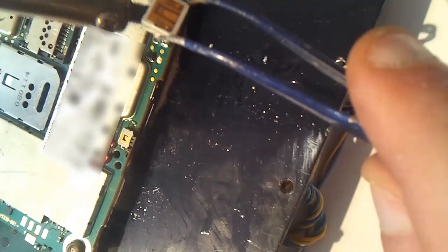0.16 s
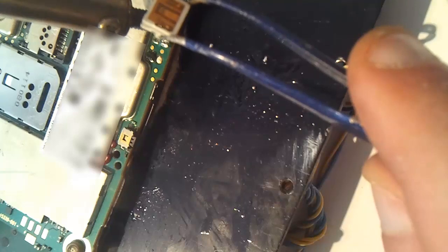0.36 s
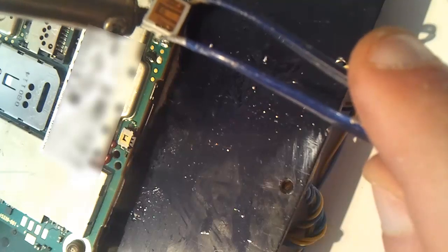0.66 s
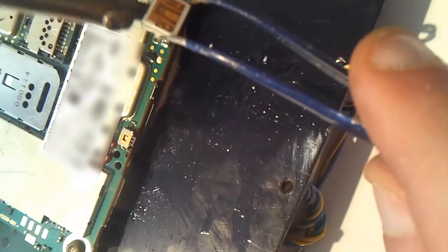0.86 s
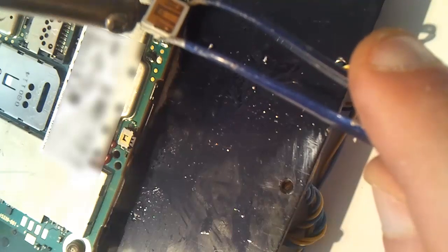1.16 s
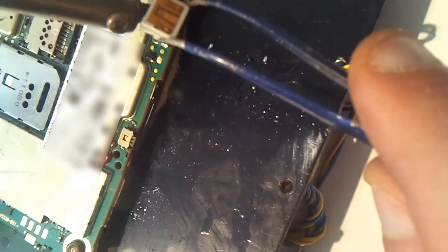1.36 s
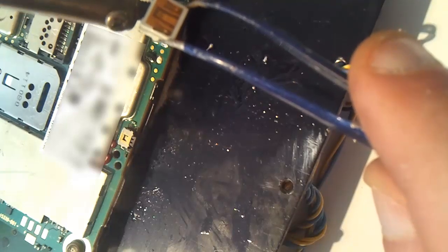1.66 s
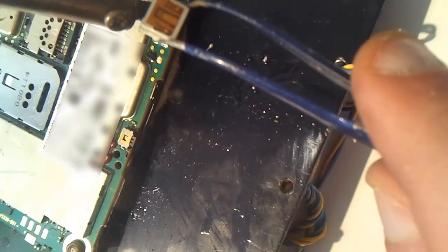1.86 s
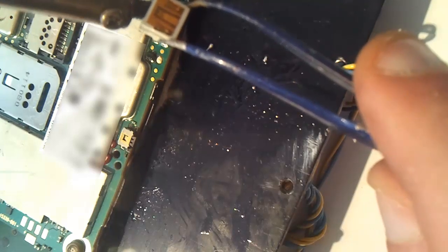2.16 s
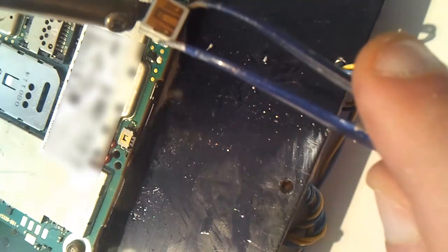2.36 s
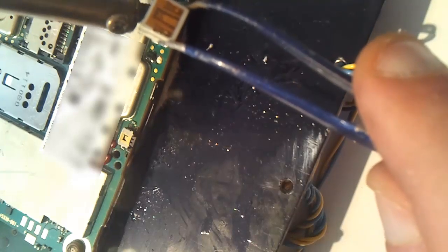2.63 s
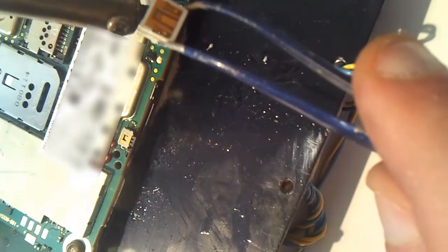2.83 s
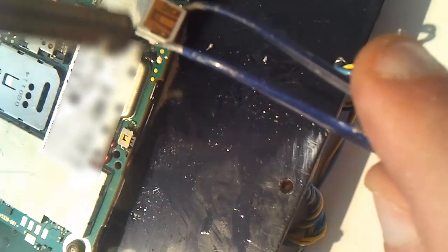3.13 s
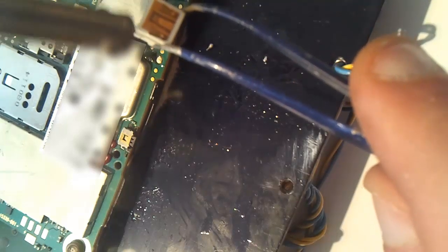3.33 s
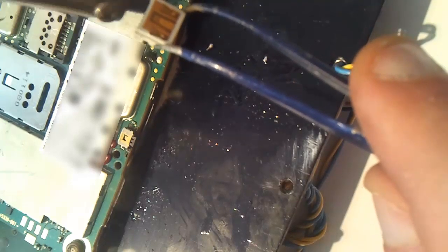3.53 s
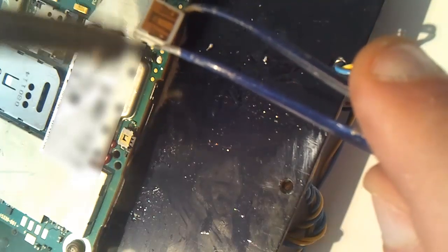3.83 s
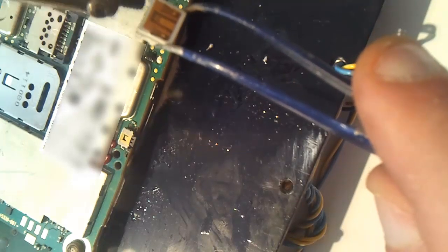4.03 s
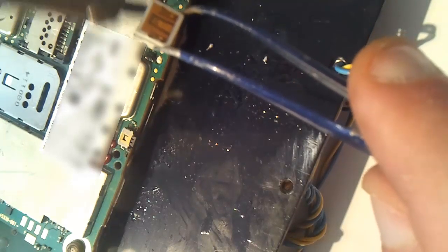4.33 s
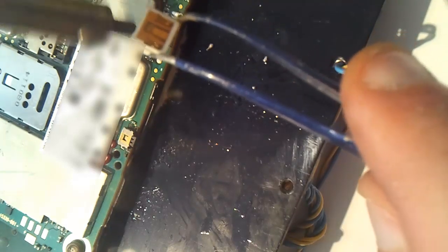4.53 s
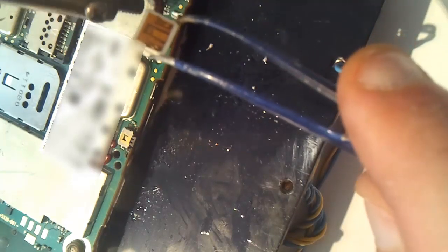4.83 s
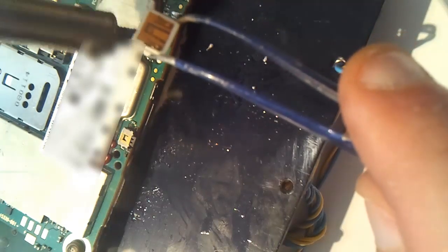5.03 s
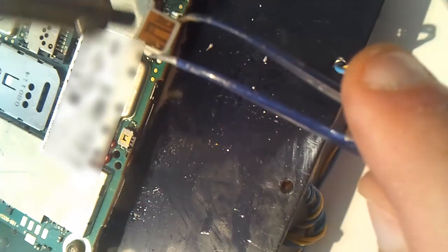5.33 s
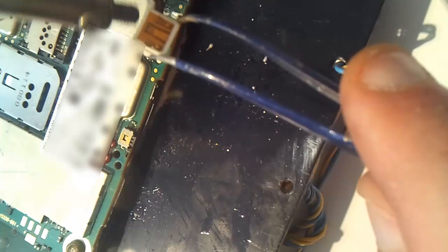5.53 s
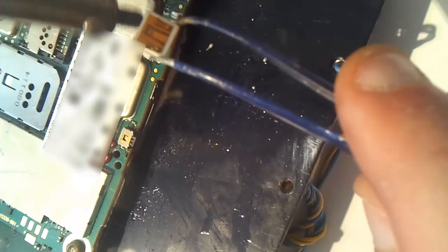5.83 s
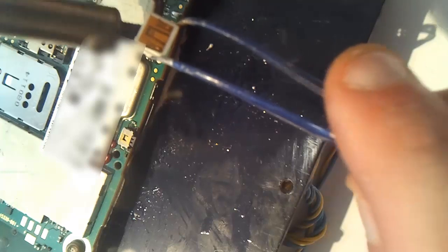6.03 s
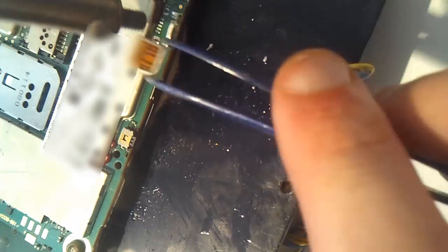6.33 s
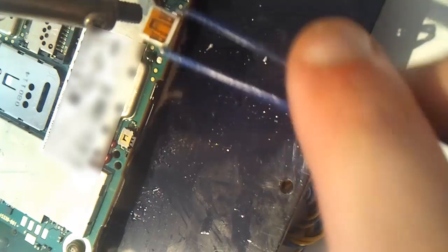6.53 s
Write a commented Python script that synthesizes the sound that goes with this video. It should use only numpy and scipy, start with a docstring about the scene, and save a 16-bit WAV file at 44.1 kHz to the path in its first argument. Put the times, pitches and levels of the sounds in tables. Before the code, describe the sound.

Close, steady rush and fan whine of a hot-air gun, its jet hissing and briefly whistling as it moves over a circuit board.

```python
"""A hot-air gun blows steadily over a circuit board, close to a single microphone.
Turbulent air rushes through the resonant barrel, and the jet hisses as the nozzle moves over the parts.
The fan whines on multiples of its rotation, the jet whistles briefly where it grazes an edge, and soft
low hums come and go. The recorder holds each of its 16 kHz samples, which mirrors the hiss upward."""
import sys
import numpy as np
from scipy import signal
from scipy.fft import rfft, irfft
from scipy.io import wavfile

SR = 44100
rng = np.random.default_rng(int(sys.argv[2]) if len(sys.argv) > 2 else 0)


def to_wav(sig):
    """Store sig (one row per channel, or 1-D mono) as 16-bit WAV at the path in sys.argv[1].

    Samples outside -1..1 are clipped; the rate is SR.
    """
    pcm = np.clip(np.atleast_2d(sig), -1, 1) * 32767
    pcm = np.round(pcm).astype(np.int16)
    wavfile.write(sys.argv[1], SR, pcm.T)  # frames by channels


N = 295029
TIME = np.arange(N) / SR
FREQS = np.maximum(np.arange(N // 2 + 1) * SR / N, 1)

# The rush as the nozzle moves about. Each row: time in seconds, relative level in dB.
RUSH_LEVELS = [(0, -16.7), (2.1, -16), (3.05, -16.5), (4.15, -16.0), (4.7, -17.0), (5.5, -16.5), (6.3, -16),
               (6.69, -16.5)]
# Broad turbulence. Each row: frequency in Hz, level in dB per Hz.
RUSH_SPECTRUM = [(25, -76), (80, -71), (200, -64.5), (500, -61.5), (900, -64), (1500, -60.0), (3000, -67),
                 (5000, -54.5), (8000, -53.5)]
# Deep air resonances of the barrel. Each row: centre in Hz, width in Hz, mid-scene level in dB per Hz.
BARREL_MODES = [(561, 63, -58.5), (670, 43, -56), (756, 146.0, -52.5), (946, 126, -46.5), (1029, 47, -46),
                (1075, 123, -46), (1340, 150, -60)]
# High air resonances of the nozzle tube. Each row: centre in Hz, width in Hz, level in dB per Hz.
NOZZLE_MODES = [(2094, 320, -55.5), (2403, 300, -53), (2802, 340, -49), (3145, 206, -49.5),
                (3315, 147.0, -52.5), (3410, 266, -49), (3804, 290, -51.5), (4043, 260, -49.5),
                (4187, 300, -50), (4780, 190, -53.5), (5050, 350, -57.5), (5580, 79, -52), (6340, 430, -51)]
# Resonances at the nozzle's rim. Each row: centre in Hz, width in Hz, relative level in dB.
RIM_MODES = [(6985, 190, -46.5), (7180, 240, -49.5)]
# Resonances that fade or grow. Each row: centre in Hz, width in Hz, first and last level in dB per Hz.
SHIFTING_MODES = [(822, 34, -46, -49.5), (1742, 400, -59.5, -53.5)]
# Resonances of the housing. Each row: centre in Hz, width in Hz, relative level in dB.
HOUSING_MODES = [(135.5, 25, -62.0), (260, 18, -57), (305, 48, -60), (359.4, 33, -55.6)]
# The hiss as the nozzle sweeps on and off the parts. Each row: time in seconds, relative level in dB.
HISS_LEVELS = [(0, -24), (0.27, -27), (0.4, -21.5), (0.64, -24), (0.76, -21.4), (1.33, -21), (1.48, -23.8),
               (1.97, -22.5), (2.63, -22.2), (2.8, -24.5), (3.27, -23), (3.48, -20.4), (3.88, -24),
               (4.1, -20), (4.25, -23.5), (4.85, -23.6), (6.0, -24), (6.69, -21.2)]
# Resonances between nozzle and board. Each row: centre in Hz, width in Hz, relative level in dB.
GAP_MODES = [(7585, 237, -49), (7900, 520, -48.5)]
# Fan tones. Each row: multiple of the rotation, level in dB rms, unsteadiness as a share of amplitude.
FAN_TONES = [(1, -51, 0.56), (3, -30, 0.33), (4, -42, 0.45), (5, -29.5, 0.15), (7, -42, 0.29),
             (8, -29.5, 0.15)]
# Edge whistles. Each row: start in seconds, length in seconds, pitch in Hz, level in dB before flicker.
EDGE_WHISTLES = [(0.041, .124, 7100, -16.5), (0.175, .05, 7160, -19), (1.984, 0.083, 7760, -22.5),
                 (2.17, 0.057, 7310, -20.5), (3.034, .06, 7870, -23), (3.511, .039, 7835, -22),
                 (3.71, .085, 7700, -21), (3.93, .12, 7135, -22.5), (4.225, .057, 7160, -21),
                 (6.171, .1, 7115, -20), (6.523, 0.12, 7220, -21)]
# Low hums. Each row: middle in seconds, length in seconds, pitch in Hz, level at the crest in dB rms.
LOW_HUMS = [(3.15, 0.16, 264, -36), (3.929, .26, 264, -40.5), (4.24, .26, 267, -38), (6.35, 1, 124, -42.5)]


def from_db(db):
    """Decibels to gain."""
    return 10 ** (np.asarray(db) / 20)


def swell(levels, depth=1.0):
    """Gain that follows a level curve about its mean; depth scales the swing."""
    level_db = np.interp(TIME, *np.transpose(levels))
    return from_db(depth * (level_db - level_db.mean()))


def noise(power):
    """Noise with the given power per Hz."""
    return irfft(rfft(rng.standard_normal(N)) * np.sqrt(power * SR / 2), N)


def drift(rate_hz):
    """Random wander with a spread of 1, mostly slower than the given rate."""
    slow = noise(1 / (1 + (FREQS / rate_hz) ** 2) ** 2)
    return slow / slow.std()


def resonances(modes):
    """Power per Hz of steep-sided resonances, each stirred by eddies of its own."""
    return sum(from_db(db) ** 2 / (1 + ((FREQS ** 2 - hz ** 2) / (FREQS * width)) ** 2) ** 2
               for hz, width, db in modes)


def sine(hz):
    """A tone of rms 1 on a moving pitch."""
    return np.sqrt(2) * np.sin(2 * np.pi * (np.cumsum(hz) / SR + rng.random()))


def airflow(roar_rise_db_per_s=0.15, flutter_db=0.17, rim_db=-0.5, housing_db=-0.6):
    """Turbulence stirs the gun's resonances: the deep barrel roars, the narrow nozzle rushes."""
    roar_gain = from_db(roar_rise_db_per_s * (TIME - TIME.mean()))  # grows as the fan gains speed
    roar = noise(resonances(BARREL_MODES)) * roar_gain
    broad_hz, broad_db = np.transpose(RUSH_SPECTRUM)
    broad_power = from_db(np.interp(np.log(FREQS), np.log(broad_hz), broad_db)) ** 2
    rim_power = from_db(rim_db) ** 2 * resonances(RIM_MODES)
    rush = noise(broad_power + resonances(NOZZLE_MODES) + rim_power)
    rush = rush * swell(RUSH_LEVELS) * from_db(flutter_db * drift(40))
    shifting = sum(noise(resonances([(hz, width, 0)])) * from_db(np.linspace(first_db, last_db, N))
                   for hz, width, first_db, last_db in SHIFTING_MODES)
    housing = from_db(housing_db) * noise(resonances(HOUSING_MODES))
    return roar + rush + shifting + housing


def jet_hiss(gain_db=-1.1, sputter_db=0.5):
    """The jet hisses in the gap above the board, more when it strikes a part."""
    hiss = noise(resonances(GAP_MODES)) * swell(HISS_LEVELS, depth=1.2)
    return hiss * from_db(gain_db + sputter_db * drift(15))


def fan_whine(start_hz=329.85, climb_hz_per_s=0.54, wobble=0.00054):
    """Rotor and blades sing on multiples of the slowly rising rotation; uneven inflow shakes each tone."""
    rotation_hz = (start_hz + climb_hz_per_s * TIME) * (1 + wobble * drift(7.3))
    whine = np.zeros(N)
    for order, db, unsteady in FAN_TONES:
        tone = from_db(db) * sine(order * rotation_hz)
        shake = (1 + unsteady * drift(3.1)) / np.hypot(1, unsteady)
        whine += tone * shake
    return whine


def edge_whistles(wander_hz=60, flicker_db=3.0, fade_s=0.0072):
    """On a sharp edge the jet locks into a wavering tone."""
    pitch, level = np.zeros(N), np.zeros(N)
    for start, length, hz, db in EDGE_WHISTLES:
        pitch[TIME >= start] = hz
        inside_s = np.minimum(TIME - start, start + length - TIME)
        level += from_db(db) * np.clip(inside_s / fade_s, 0, 1)
    flicker = from_db(flicker_db * drift(80))
    return level * flicker * sine(pitch + wander_hz * drift(84.7))


def low_hums():
    """Soft low tones rise and sink again."""
    hums = np.zeros(N)
    for middle, length, hz, db in LOW_HUMS:
        envelope = np.cos(np.pi * np.clip((TIME - middle) / length, -0.5, 0.5)) ** 2
        hums += from_db(db) * envelope * sine(np.full(N, hz))
    return hums


def scene():
    """The gun over the board, in mono from close by."""
    return (airflow() + jet_hiss() + fan_whine() + edge_whistles() + low_hums())[None]


def record(dry, sampling_hz=16000, cutoff_hz=15700):
    """The recorder holds each sample, adding a mirror image and fine grit above 8 kHz; the top is cut."""
    sampled = signal.resample(dry, round(N * sampling_hz / SR), axis=1)
    clipped = np.clip(sampled, -1, 1)
    held = clipped[:, np.arange(N) * sampling_hz // SR]
    return irfft(rfft(held) * (FREQS < cutoff_hz), N)


dry = scene()
out = record(dry)
to_wav(out)
```